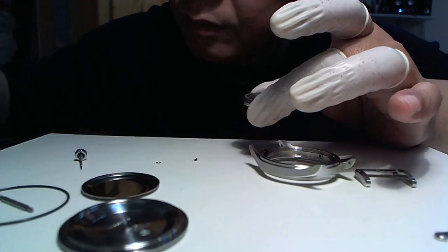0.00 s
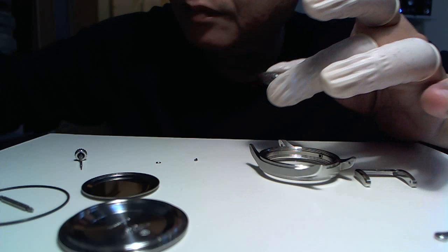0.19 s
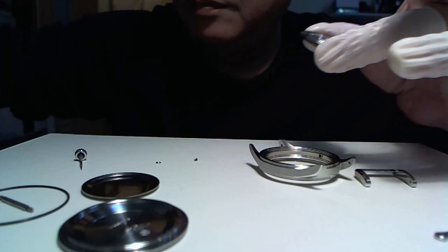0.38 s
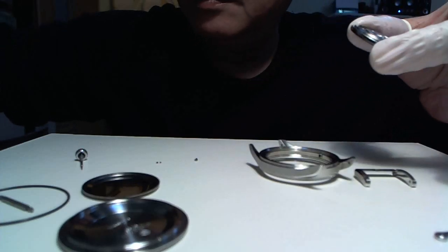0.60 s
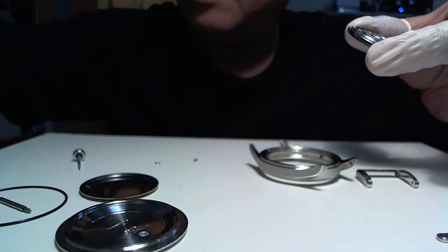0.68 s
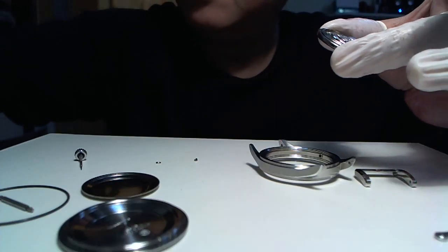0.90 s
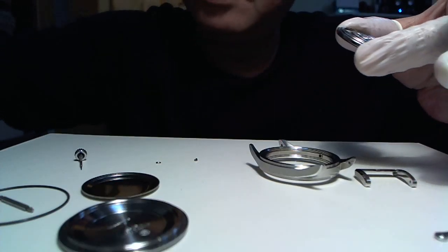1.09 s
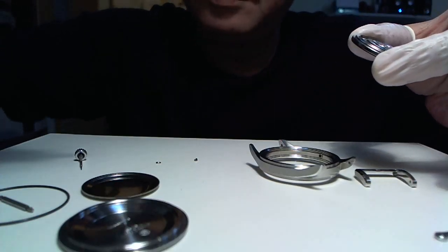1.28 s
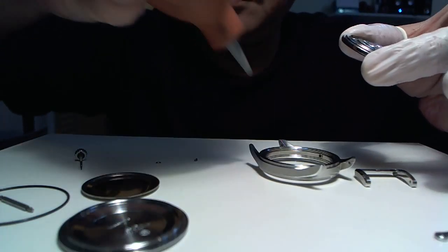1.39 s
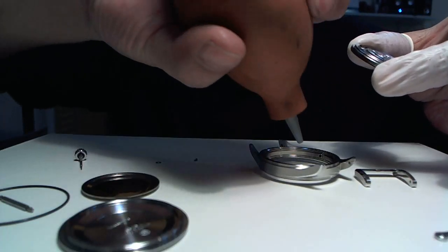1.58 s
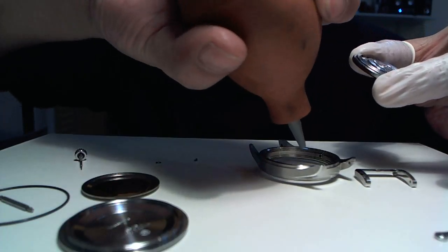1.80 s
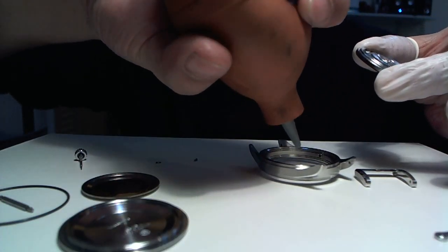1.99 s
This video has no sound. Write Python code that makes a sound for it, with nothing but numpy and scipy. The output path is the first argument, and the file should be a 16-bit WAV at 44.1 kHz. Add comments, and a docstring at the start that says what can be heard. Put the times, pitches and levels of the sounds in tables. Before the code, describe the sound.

A rubber hand blower gives a small spit with a thin valve whistle, then one hard sputtering blast very close to the microphone; after a pause, soft puffs hiss over a metal watch case in a quiet, humming room.

```python
"""A rubber hand blower at a workbench in a quiet room with a low, wavering hum.
Close up it gives a short spit with a thin valve whistle, then one hard, sputtering blast and a fainter whistle.
Dull handling bumps run through the scene, with one faint rub; later, soft puffs hiss over a small metal case.
Air is shaped noise under flow curves, the spit and sputter are sharp noise bursts, and the whistle, hum
and bumps are sines. Nearby reflections and a short room tail surround the blower."""
import sys
import numpy as np
from scipy import signal
from scipy.fft import rfft, irfft, next_fast_len
from scipy.io import wavfile
from scipy.ndimage import map_coordinates

SR = 44100
rng = np.random.default_rng(int(sys.argv[2]) if len(sys.argv) > 2 else 0)


def dump_mix(stems):
    """Bounce the given channels to the path in sys.argv[1] as a 16-bit WAV at rate SR."""
    frames = np.atleast_2d(stems).T  # one column per channel
    limited = np.clip(frames, -1, 1)  # hard clip at full scale
    pcm = np.round(limited * 32767).astype(np.int16)
    wavfile.write(sys.argv[1], SR, pcm)


N = 88200
T = np.arange(N) / SR

# resonances of the close air, in both jet and spurts: pitch_hz, width_hz, lift_db
NOZZLE_RINGS = [(1150, 120, 3), (2260, 40, 1.5), (3660, 91.4, 6.5), (3820, 83, 8.5), (4870, 150, 5.5),
                (6277, 23, -1), (7950, 80, 5), (9410, 33, 5.5), (12040, 65, 11.5)]


def amp(db):
    """Decibels to gain."""
    return 10 ** (np.asarray(db) / 20)


def unit(x):
    """Scale to rms 1."""
    return x / np.sqrt(np.mean(x ** 2) + 1e-20)


def along(points, hz):
    """Read a curve of (Hz, value) points on a log frequency axis."""
    point_hz, value = np.transpose(points)
    return np.interp(np.log(hz + 1), np.log(point_hz + 1), value)


def wobble(rate_hz):
    """A smooth random curve with rate_hz random knots a second."""
    knots = rng.standard_normal(2000)
    return map_coordinates(knots, [T * rate_hz], mode="wrap")


def filtered(x, response):
    """Shape the spectrum of x by a response given as a function of frequency."""
    m = next_fast_len(N + SR // 4)
    spectrum = rfft(x, m) * response(np.fft.rfftfreq(m, 1 / SR))
    return irfft(spectrum, m)[..., :N]


def noise(colour, rings=()):
    """Noise of rms 1 with a broad colour, lifted at each resonance."""
    def response(f):
        power = 1
        for hz, width_hz, db in rings:
            power = power + amp(db) ** 2 / (1 + (2 * (f - hz) / width_hz) ** 2)
        return amp(along(colour, f)) * np.sqrt(power)
    return unit(filtered(rng.standard_normal(N), response))


def band(hz, width_hz, order=2):
    """Noise of rms 1 in one steep-sided resonance."""
    def response(f):
        return 1 / np.hypot(1, (2 * (f - hz) / width_hz) ** order)
    return unit(filtered(rng.standard_normal(N), response))


def decay(t, t60_s):
    """Exponential fall by 60 dB in t60_s."""
    return np.exp(-np.log(1000) * t / t60_s)


def squeeze(start_s, level_db, attack_s, hold_s, sag_db_s, release_db_s):
    """Air flow: a smooth rise, a sagging hold, a release that is straight in dB."""
    rise = np.sin(np.pi / 2 * np.clip((T - start_s) / attack_s, 0, 1)) ** 2
    t = T - start_s - attack_s
    sag_db = sag_db_s * np.clip(t, 0, hold_s)
    release_db = release_db_s * np.maximum(t - hold_s, 0)
    return rise * amp(level_db - sag_db - release_db)


def placed(x, pan):
    """Mono to stereo with a left-right level difference per frequency."""
    halves = np.array([[.5], [-.5]])
    return filtered(x, lambda f: amp(along(pan, f) * halves))


def background():
    """Steady coloured room noise under hum sines that waver in level and phase."""
    # colour of the room noise: frequency_hz, relative_db
    floor_colour = [(25, -59.5), (45, -39), (75, -28), (100, -6), (135, -7.5), (175, -6.5), (230, -4),
                    (350, -7), (500, -13.5), (800, -8.5), (1100, -14.5), (1700, -21.5), (2400, -20.5),
                    (3100, -26.5), (5200, -27.5), (7200, -40.5), (10000, -42), (15000, -61)]
    # hum tones: pitch_hz, level_db (rms)
    hum_tones = [(99.5, -64.5), (168, -65.5), (222, -58), (666, -68), (820, -67.5)]
    floor_db = -52.5
    hum = np.zeros(N)
    for hz, db in hum_tones:
        phase = 2 * np.pi * hz * T + .6 * wobble(19)
        hum += amp(db + 0.67 * wobble(8.5)) * np.sin(phase)
    return amp(floor_db) * noise(floor_colour) + np.sqrt(2) * hum


def handling():
    """Soft bumps that each ring one decaying mode, and a faint rub of coloured noise."""
    # dull bumps: start_s, level_db (ahead of the doubling below), pitch_hz
    bumps = [(0.035, -36.5, 222.6), (.586, -40, 226.4), (1.16, -36, 227), (1.465, -41, 389.4),
             (1.572, -42, 221.7), (1.869, -39, 674)]
    # faint rub: start_s, level_db, attack_s, hold_s, sag_db_per_s, release_db_per_s
    rubs = [(0.575, -50.5, .006, .018, 30, 1200)]
    # colour of the rub: frequency_hz, relative_db
    rub_colour = [(1000, -29), (2200, 8), (3800, -12), (5400, -1), (7000, -17), (10000, -36)]
    rise_s, t60_s = 0.0091, 0.1
    out = sum(squeeze(*row) for row in rubs) * noise(rub_colour)
    for start_s, db, hz in bumps:
        t = np.maximum(T - start_s, 0)
        envelope = (1 - np.exp(-t / rise_s)) * decay(t, t60_s)
        out += 2 * amp(db) * envelope * np.sin(2 * np.pi * hz * t)
    return out


def puffs():
    """Soft puffs hiss at the tip; the strongest also strikes the case and sounds its hollow."""
    # puffs: start_s, level_db, attack_s, hold_s, sag_db_per_s, release_db_per_s,
    # hiss_centre_hz, hiss_width_hz, broad_air_db (relative to the hiss)
    soft_puffs = [(1.204, -65.5, .008, 0.019, 100, 300, 9430, 1520, -20),
                  (1.25, -51, 0.0039, .012, 150, 279, 9710, 2800, -13.5),
                  (1.665, -24.5, 0.036, 0.03, 140, 529, 9160, 1586, -3.5),
                  (1.789, -38.5, 0.029, 0.009, 40, 483, 9350, 1500, -11),
                  (1.807, -44.5, 0.013, 0.022, 56, 800, 11300, 2000, -5.5),
                  (1.871, -50, 0.0058, 0.016, 0, 450, 9700, 1600, -10),
                  (1.891, -33.5, 0.047, 0.039, 41, 622, 8950, 2000, 2)]
    # colour of the broad air: frequency_hz, relative_db
    air_colour = [(300, -63), (2000, -17.5), (3100, -21), (3600, -3.5), (5200, -4.5), (6500, 5.5),
                  (7300, -2), (9000, -3.5), (10500, -14), (12500, -21), (15500, -25)]
    # jet striking the metal case: start_s, level_db, attack_s, hold_s, sag_db_per_s, release_db_per_s
    case_blows = [(1.622, -29.5, 0.0073, 0.06, 6, 336)]
    # colour of the jet on the case: frequency_hz, relative_db
    case_colour = [(300, -34.5), (1500, -27.5), (2250, -4), (3000, -3.5), (4500, 3), (6500, -4),
                   (8000, -11), (9500, -7.5), (12000, -18.5), (15500, -30)]
    # resonances of the jet on the case: pitch_hz, width_hz, lift_db
    case_rings = [(2770, 136, -2), (4450, 150, -12), (5230, 120, 7), (12900, 100, 9)]
    # hollow of the case: start_s, level_db, attack_s, hold_s, sag_db_per_s, release_db_per_s,
    # pitch_hz, width_hz
    case_tones = [(1.621, -26.5, 0.0088, 0.14, 125, 330, 4140, 520)]
    air_lag_s = 0.0078  # the broad rush builds up after the thin hiss
    air = noise(air_colour)
    out = np.zeros(N)
    for start_s, *flow, hz, width_hz, air_db in soft_puffs:
        out += squeeze(start_s, *flow) * band(hz, width_hz, order=3)
        out += squeeze(start_s + air_lag_s, *flow) * amp(air_db) * air
    out += sum(squeeze(*row) for row in case_blows) * noise(case_colour, case_rings)
    for *flow, hz, width_hz in case_tones:
        out += squeeze(*flow) * band(hz, width_hz)
    return out * amp(0.49 * wobble(200))  # light flutter


def whistle():
    """The valve sings with a fluttering pitch that droops as the flow grows."""
    # whistles: start_s, level_db, attack_s, hold_s, sag_db_per_s, release_db_per_s,
    # pitch_hz (ahead of droop and flutter), pitch_waver_share
    whistles = [(.086, -31, .028, 0.018, 170, 801, 2823, 0.0053),
                (0.345, -36, 0.007, .022, 100, 550, 2755, 0.08)]
    # levels of the harmonics, from the fundamental up: relative_db
    partials_db = [2, 4.5, -2, -14]
    droop, jitter = .02, .016  # pitch shares: drop at full flow, fast flutter
    rough_db = 3  # depth of the level flutter
    out = np.zeros(N)
    for *shape, hz, waver in whistles:
        flow = squeeze(*shape)
        bend = waver * wobble(170) + jitter * wobble(1000) - droop * flow / flow.max()
        phase = 2 * np.pi * np.cumsum(hz * (1 + bend)) / SR
        tone = np.zeros(N)
        for harmonic, db in enumerate(partials_db, start=1):
            tone += amp(db + wobble(210)) * np.sin(harmonic * phase)
        out += flow * unit(tone * amp(rough_db * wobble(220)))
    return out


def jet(flutter_db=2.0, flutter_rate_hz=350):
    """The fluttering rush between the spurts, and the smoother intake through the valve after it."""
    # close blasts: start_s, level_db, attack_s, hold_s, sag_db_per_s, release_db_per_s
    blasts = [(0.052, -30, 0.0045, 0.025, 58, 376.5), (0.197, -16, 0.0063, 0.073, 88, 428.5),
              (0.283, -20.5, .004, 0.044, 50.5, 437)]
    # colour of the rush: frequency_hz, relative_db
    jet_colour = [(60, -32.5), (110, -14), (230, -17.5), (480, -23.5), (860, -32.5), (1130, -9),
                  (1590, -13), (2270, -0.5), (3100, -5), (5500, -4), (6900, -9), (8950, -5.5),
                  (12300, -20.5), (15500, -44)]
    # air drawn through the valve: start_s, level_db, attack_s, hold_s, sag_db_per_s, release_db_per_s
    intakes = [(0.081, -44.5, .008, 0.045, 81, 331), (0.352, -41, .015, 0.036, 130, 248)]
    # colour of the intake: frequency_hz, relative_db
    intake_colour = [(1200, -39), (2300, -13), (3500, -6), (4500, -10.5), (6300, -1), (9200, -1),
                     (11500, -16), (14000, -31.5)]
    flutter = amp(flutter_db * wobble(flutter_rate_hz))
    rush = unit(noise(jet_colour, NOZZLE_RINGS) * flutter)
    blown = sum(squeeze(*row) for row in blasts) * rush
    drawn = sum(squeeze(*row) for row in intakes) * noise(intake_colour)
    return blown + drawn


def spurts():
    """Each spurt is a sharp burst of air that rings the nozzle and thumps the microphone."""
    # air breaking out: start_s, level_db, fall_t60_s, nozzle_ring_hz, nozzle_ring_db,
    # thump_db (ahead of the 8 dB cut below); ring and thump are relative to the burst
    bursts = [(0.0562, -16, 0.013, 5000, -0.5, -37), (0.0612, -22, 0.02, 1900, -1, -41),
              (0.0642, -23.5, 0.018, 1400, -1.5, -40), (0.0701, -19.5, 0.024, 5000, -3.5, -37),
              (.2030, 2.5, 0.033, 6250, -6.5, -6), (0.2245, -3, 0.029, 3680, -3, -10),
              (0.2353, -5.5, 0.0069, 3700, 4, -8.5), (0.242, -13, .014, 3650, 8, -16.5),
              (0.2468, -15.5, 0.013, 3650, 5.5, -20), (.2530, -16.5, 0.013, 3700, 7, -20),
              (0.2587, -14, .012, 3700, 0.5, -19), (0.2625, -23.5, 0.0097, 2400, -2.5, -20),
              (0.2769, -8, .016, 3500, -6, -20), (0.2828, -12, 0.028, 2400, -3.5, -17),
              (0.2933, -12, 0.012, 2400, -3, -21.5), (0.3037, -11.5, 0.02, 2400, -8, -20.5),
              (.3108, -13, 0.023, 3500, -4.5, -16.5), (0.3175, -14, .015, 3500, -0.5, -22.5),
              (0.3239, -18, 0.024, 1200, -10, -20.5)]
    # colour of the burst: frequency_hz, relative_db
    crack_colour = [(100, -43), (850, -28), (1100, 0.5), (1600, -7), (2400, 3.5), (4200, -8.5),
                    (5000, -0.5), (6200, -0.5), (9000, -1), (10500, -8), (13000, -13.5), (15500, -40.5)]
    # colour of the low thump: frequency_hz, relative_db
    thump_colour = [(25, -39.5), (60, -14.5), (100, 3.5), (200, 1), (330, -4.5), (480, 1), (620, -1.5),
                    (800, -2.5), (1200, -9), (3000, -41.5)]
    # resonances of the thump: pitch_hz, width_hz, lift_db
    thump_rings = [(103, 30, 4.5), (228, 180, -1), (395, 120, 7), (720, 130, 8)]
    rise_s, nozzle_width_hz = .0002, 410
    crack = noise(crack_colour, NOZZLE_RINGS)
    thump = noise(thump_colour, thump_rings)
    out = np.zeros(N)
    for start_s, db, t60_s, ring_hz, ring_db, thump_db in bursts:
        ring = band(ring_hz, nozzle_width_hz, order=4)
        t = np.maximum(T - start_s, 0)
        rise = 1 - np.exp(-t / rise_s)
        fall = decay(t, t60_s)
        sharp = fall * (crack + amp(ring_db) * ring)
        low = fall ** 0.58 * amp(thump_db - 8) * thump  # the thump falls more slowly
        out += amp(db) * rise * (sharp + low)
    return out


def bench(x):
    """The direct sound plus its nearest reflections, each a delayed copy."""
    # off the bench and nearby things: delay_s, gain (linear)
    reflections = [(.00068, 0.2), (.00081, 0.02), (.00184, -.13)]

    def response(f):
        return 1 + sum(gain * np.exp(-2j * np.pi * f * delay_s) for delay_s, gain in reflections)
    return filtered(x, response)


def room(x):
    """The short, nearly mono answer of the workshop: decaying noise tails for mid and side."""
    t60_s, level_db, side_db = 0.27, -32, -18.5  # side is relative to mid
    t = T[:SR // 2]
    envelope = decay(t, t60_s) * (1 - np.exp(-t / .004))
    tails = rng.standard_normal((2, len(t))) * envelope
    tails = tails / np.linalg.norm(tails[0])
    mid, side = signal.fftconvolve(x[None], tails, axes=1)[:, :N]
    return amp(level_db) * (mid + amp(side_db) * np.array([side, -side]))


def scene():
    """Close blasts, soft puffs and the room around them."""
    # stereo balance of background and handling: frequency_hz, left_minus_right_db
    floor_pan = [(60, -7), (150, -4), (380, -5), (950, 0.5), (2380, 1), (5980, 0.5), (15000, 0.5)]
    # stereo balance of the close blower: frequency_hz, left_minus_right_db
    blast_pan = [(60, -1), (160, -1.7), (320, -1), (450, 8), (740, 8), (1220, -.5), (2200, -3.3),
                 (3300, -2.2), (5500, -.2), (15000, -.3)]
    puff_pan_db = -.5  # left minus right
    under = placed(background() + handling(), floor_pan)
    soft = bench(puffs())
    close = bench(whistle() + jet() + spurts())
    soft_stereo = soft * amp(puff_pan_db * np.array([[.5], [-.5]]))
    return under + soft_stereo + placed(close, blast_pan) + room(close + soft)


def record(dry):
    """The loudest peaks are rounded off; the top of the treble rolls off steeply."""
    clip_top, top_hz = 0.67, 15400  # peak ceiling (linear), treble corner
    clipped = dry / (1 + np.abs(dry / clip_top) ** 6) ** (1 / 6)
    return filtered(clipped, lambda hz: 1 / np.hypot(1, (hz / top_hz) ** 45))


dry = scene()
out = record(dry)
dump_mix(out)
```